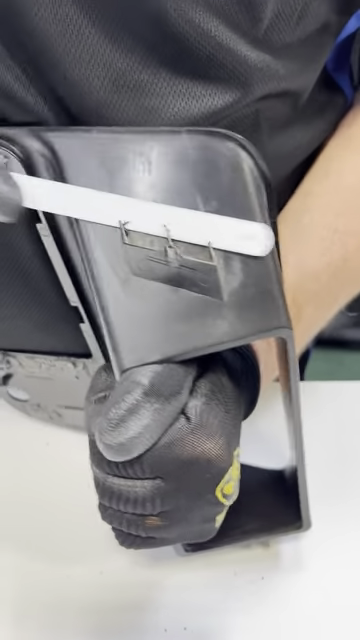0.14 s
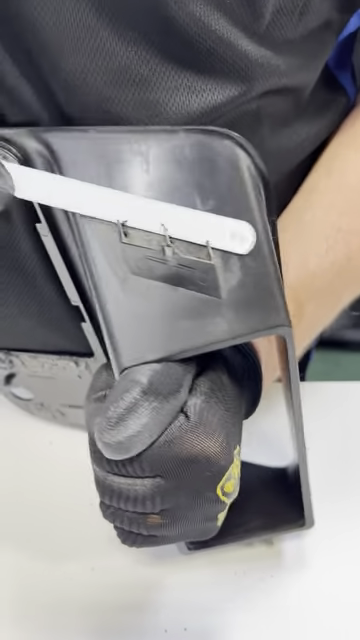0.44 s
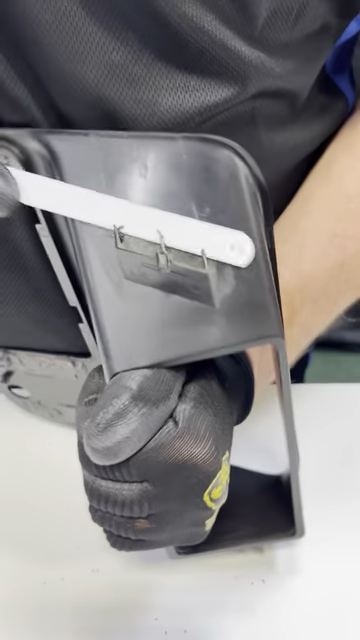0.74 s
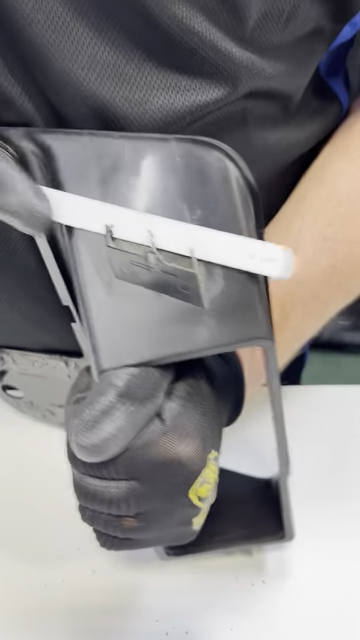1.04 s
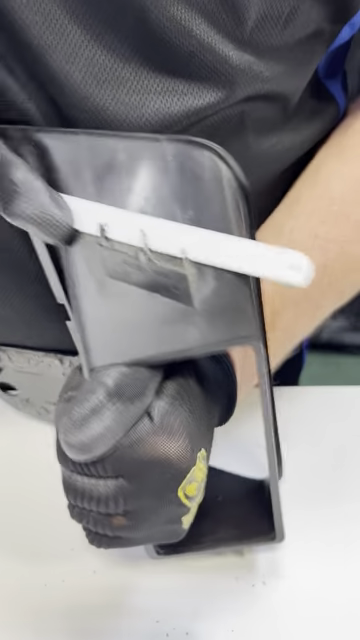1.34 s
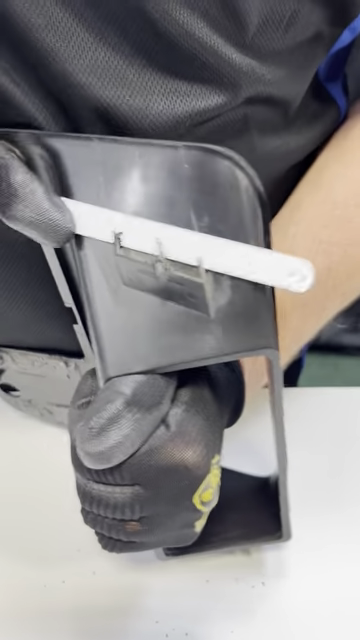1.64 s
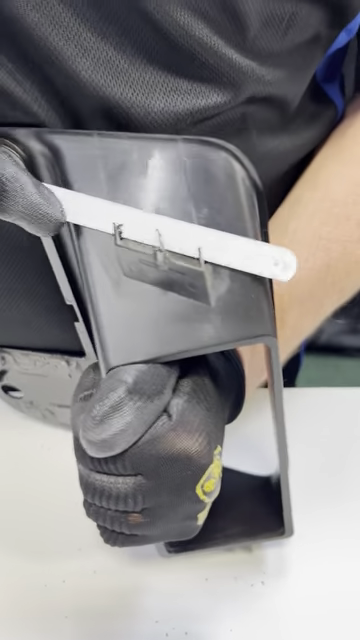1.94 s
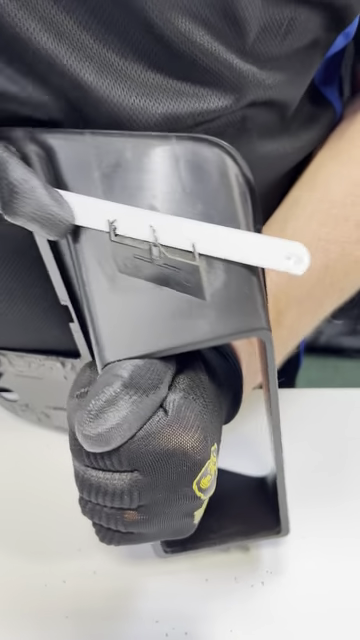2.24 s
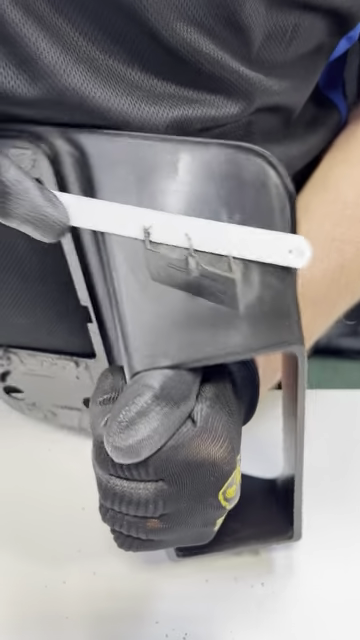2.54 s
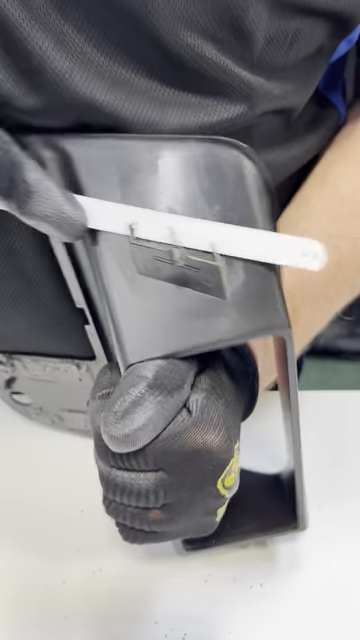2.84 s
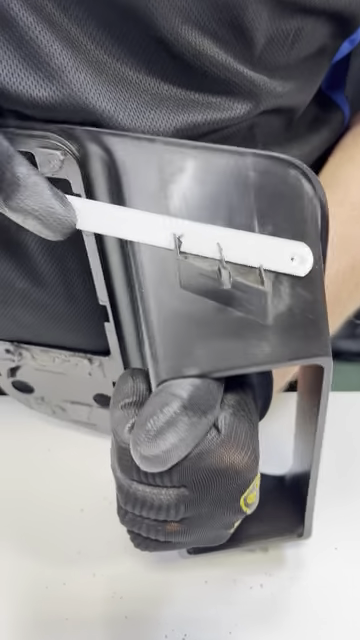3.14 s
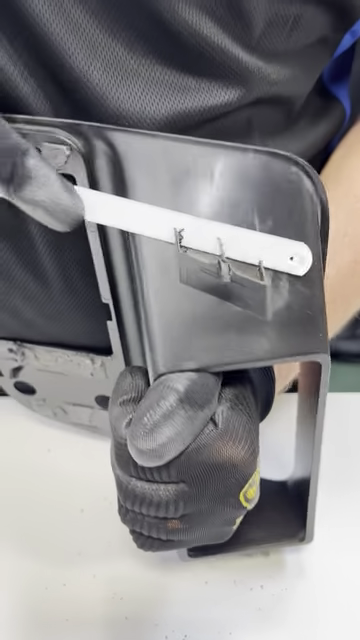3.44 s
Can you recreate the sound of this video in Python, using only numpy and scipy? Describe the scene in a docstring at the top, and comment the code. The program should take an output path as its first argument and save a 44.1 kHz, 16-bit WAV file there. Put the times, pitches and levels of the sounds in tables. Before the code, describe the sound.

Close by in a workshop, a hacksaw blade rasps and buzzes rapidly through hollow plastic, which rumbles softly. The sawing falters into a few uneven scrapes and clicks, then the blade slides faintly in the cut.

```python
"""In a workshop, close by, a bare hacksaw blade saws a hand-held plastic housing in quick strokes.
In each stroke the teeth speed up and slow down, ringing the plastic and tearing off chips.
Now and then a tooth snags. The housing rumbles in the gloved hand and thumps as it springs back.
The strokes falter and stop, and the blade slides faintly in the cut."""
import sys
import numpy as np
from scipy import signal
from scipy.fft import rfft, irfft
from scipy.io import wavfile

SR = 44100
rng = np.random.default_rng(int(sys.argv[2]) if len(sys.argv) > 2 else 0)


def int16_out(signal):
    """Quantize to a 16-bit WAV file."""
    q = np.round(np.clip(np.atleast_2d(signal).T, -1, 1) * 32767)
    wavfile.write(sys.argv[1], SR, q.astype(np.int16))


N = 158760  # 3.6 seconds


def undb(db):
    """Turn decibels into a number to multiply by."""
    return 10 ** (np.asarray(db) / 20)


def unit(x):
    """Scale a signal so its average level (rms) is 1."""
    return x / np.sqrt(np.mean(x ** 2))


def wander(hz):
    """Drift to a new random value hz times a second, with a typical size of 1."""
    return unit(np.interp(np.arange(N) / SR * hz, np.arange(N), rng.standard_normal(N)))


def hump(t, start, top, end):
    """Half a sine wave that rises from start to top and falls to end."""
    return np.abs(np.sin(np.pi * np.interp(t, [start, top, end], [0, .5, 1])))


def pitch_curve(points, size):
    """Join (pitch_hz, value) points into a curve over the spectrum of size samples."""
    hz, value = np.array(points, float).T
    return np.interp(np.log(np.fft.rfftfreq(size, 1 / SR) + 1), np.log(hz + 1), value)


def colour(x, points):
    """Make some pitches louder and others softer; white noise keeps its overall level."""
    gains = unit(undb(pitch_curve(points, size=16384)))
    cepstrum = irfft(np.log(gains))
    half = len(cepstrum) // 2
    cepstrum[1:half] *= 2  # folded so the filter rings only after a sound, never before
    cepstrum[half + 1:] = 0
    response = irfft(np.exp(rfft(cepstrum)))[:half]
    return signal.fftconvolve(x, response)[:len(x)]


def play_through(drive, level, body):
    """Send a signal through a filter (body) so the result follows the given level."""
    return body(drive * level) / np.std(body(drive))


# Saw strokes: start_s, fastest_s, hardest_s, end_s, top_teeth_hz, buzz_db, rasp_db, hiss_db
STROKES = [ (-.06, -.03, -.025, .014, 600, -14, -17, -29), (.086, .118, .130, .168, 735, -11, -19, -29.5),
           (.212, .245, .250, .292, 790, -21.5, -18, -29.5), (.356, .395, .402, .450, 665, -13, -19, -28.5),
           (.488, .522, .526, .565, 620, -25, -20, -32), (.635, .677, .678, .722, 570, -20, -21, -35),
           (.751, .783, .788, .816, 595, -22, -19, -33), (.899, .940, .938, .976, 595, -15, -21, -35),
           (1.001, 1.038, 1.032, 1.074, 590, -21, -19, -34),
           (1.152, 1.193, 1.200, 1.238, 690, -17, -25, -35),
           (1.266, 1.314, 1.324, 1.352, 635, -21, -20, -32),
           (1.430, 1.465, 1.466, 1.515, 675, -19, -23, -35),
           (1.556, 1.592, 1.598, 1.638, 590, -23, -19, -33),
           (1.732, 1.760, 1.754, 1.814, 705, -17, -19, -33),
           (1.856, 1.900, 1.902, 1.940, 460, -21, -24, -37),
           (2.030, 2.060, 2.060, 2.105, 400, -56, -50, -58.5),
           (2.146, 2.175, 2.172, 2.208, 500, -45, -37, -42),
           (2.284, 2.320, 2.320, 2.374, 500, -26, -29, -40),
           (2.443, 2.458, 2.458, 2.472, 420, -25, -22, -31.5),
           (2.605, 2.635, 2.635, 2.658, 450, -66, -46, -52),
           (2.735, 2.750, 2.750, 2.775, 480, -36, -24, -33),
           (2.862, 2.896, 2.893, 2.925, 640, -17, -20, -31.5),
           (2.905, 2.925, 2.925, 2.965, 400, -45.5, -36.5, -46.5),
           (3.035, 3.075, 3.075, 3.120, 400, -59, -49.5, -55.5),
           (3.285, 3.322, 3.322, 3.360, 400, -68.5, -56.5, -57.5),
           (3.470, 3.515, 3.515, 3.556, 450, -58, -47, -53)]

def arm_strokes():
    """Each push of the arm swells and fades the teeth per second and the buzz, rasp and hiss levels."""
    t = np.arange(N) / SR
    edge_speed = .32  # share of top speed at which the teeth start to bite
    teeth_hz, levels = np.zeros(N), np.zeros((3, N))
    for start, fastest, hardest, end, top_hz, buzz_db, rasp_db, hiss_db in STROKES:
        inside = (t > start) & (t < end)
        speed = hump(t[inside], start, fastest, end) ** 1.25
        teeth_hz[inside] = top_hz * (edge_speed + (1 - edge_speed) * speed)
        push = hump(t[inside], start, hardest, end)
        levels[:, inside] += [undb(buzz_db) * push ** 2.1,
                              undb(rasp_db) * push ** 1.7,
                              undb(hiss_db) * push ** 1.2]
    return teeth_hz, levels


def tooth_phase(teeth_hz, jitter=.025):
    """How far the blade is from one tooth to the next, 0 to 1; it restarts after each pause."""
    teeth_passed = np.cumsum(teeth_hz * (1 + jitter * wander(hz=400))) / SR
    at_last_pause = np.maximum.accumulate(np.where(teeth_hz == 0, teeth_passed, 0))
    return (teeth_passed - at_last_pause) % 1


# Notes the plastic rings at: pitch_hz, width_hz, gain_db
HOUSING_NOTES = [(430, 120, -13), (580, 100, -5), (675, 100, -2), (888, 100, 2), (1030, 140, -0.5),
                 (1160, 130, -3), (1310, 130, -3), (1790, 180, -5), (2080, 170, -3), (2640, 260, -13),
                 (3090, 250, -14), (4300, 500, -17)]

def housing(x):
    """The plastic rings briefly at its own notes when something shakes it."""
    out = 0
    for k, (hz, width, db) in enumerate(HOUSING_NOTES):
        ring = signal.lfilter(*signal.iirpeak(hz, hz / width, fs=SR), x)
        out = out + (-1) ** k * undb(db) * ring  # every other note is flipped over
    return out


# Tone of the teeth's buzz: pitch_hz, gain_db
BUZZ_TONE = [(100, -16), (300, -6), (600, 2), (1200, -1), (2000, -6), (2700, -10), (3500, -14), (8000, -26)]

def tooth_buzz(phase, bite, level, sharpness=45):
    """Each tooth plucks the plastic, so fast that the plucks blur into a buzz."""
    plucks = np.exp(-sharpness * (1 - np.cos(2 * np.pi * phase))) * bite
    ring = colour(housing(plucks * level), BUZZ_TONE)
    return unit(ring) * np.sqrt(np.mean(level ** 2))


def chips(tearing, scatter_db=2.6):
    """Chips tear off in uneven bursts of noise."""
    return tearing * rng.standard_normal(N) * undb(scatter_db * wander(hz=1000))


# Tone of the rasp: pitch_hz, gain_db
RASP_TONE = [(100, -5), (300, 1), (600, -1), (1200, -2), (2000, -1.5), (2700, -1), (3500, -3.5),
             (8000, -10), (16000, -22)]

def chip_rasp(tearing, level):
    """Tearing chips shake the housing into a rough rasp."""
    return play_through(chips(tearing), level, lambda x: colour(housing(x), RASP_TONE))


# Tone of the hiss: pitch_hz, gain_db
HISS_TONE = [(200, -12), (1000, -6), (2500, -1), (3500, -3), (4500, -1), (6000, 1), (8500, -1), (11000, 0),
             (13000, -7), (16000, -12)]

def chip_hiss(tearing, level):
    """Tearing chips also give a bright hiss, straight from the cut."""
    return play_through(chips(tearing), level, lambda x: colour(x, HISS_TONE))


def sawing(bite_db=1.8, grip_db=1.6, wide_rasp_db=-14, wide_hiss_db=-12):
    """Each tooth plucks, then tears out chips. Gives the main sound and a part for stereo width."""
    teeth_hz, (buzz_level, rasp_level, hiss_level) = arm_strokes()
    phase = tooth_phase(teeth_hz)
    moving = teeth_hz > 0
    burst = np.exp(-phase / .45) * moving  # tearing fades before the next tooth
    burst = unit(burst) * np.sqrt(np.mean(moving)) + ~moving  # average level 1, moving or not
    bite = undb(bite_db * wander(hz=600))  # some teeth bite harder
    grip = undb(grip_db * wander(hz=170))  # the blade chatters
    tearing = bite * grip * burst
    buzz = tooth_buzz(phase, bite, buzz_level)
    rasp, wide_rasp = (chip_rasp(tearing, rasp_level) for _ in range(2))
    hiss, wide_hiss = (chip_hiss(tearing, hiss_level) for _ in range(2))
    return buzz + rasp + hiss, undb(wide_rasp_db) * wide_rasp + undb(wide_hiss_db) * wide_hiss


# Tone of the shuddering housing: pitch_hz, gain_db
RUMBLE_TONE = [(20, -18), (32, -14), (43, -6), (60, -13), (80, 2), (98, -6), (125, -6), (145, -9),
               (172, -3.5), (205, -8), (238, -6), (310, -16), (450, -16.5), (1000, -52)]
# How hard it shudders: time_s, level_db
RUMBLE_LEVELS = [(0.0, -35), (0.2, -40), (0.59, -33), (0.87, -43), (0.9, -38), (1.96, -38), (2.02, -46),
                 (2.22, -34), (2.26, -47), (2.31, -31), (2.67, -42), (2.69, -50), (2.76, -30), (2.84, -44),
                 (2.87, -32), (3.41, -62), (3.54, -47), (3.6, -62)]

def rumble():
    """The whole housing shudders in the hand while it is being sawn."""
    times, db = np.array(RUMBLE_LEVELS).T
    level = undb(np.interp(np.arange(N) / SR, times, db))
    return unit(colour(rng.standard_normal(N), RUMBLE_TONE)) * level


# Tone of the room's echo: pitch_hz, gain_db
ECHO_TONE = [(100, -4), (400, 0), (650, -1), (1000, -1), (2500, -4), (6000, -1), (10500, -4), (13000, -18)]
# Tone of the room's still air: pitch_hz, gain_db
AIR_TONE = [(30, -4), (120, -7.5), (300, -16), (1000, -23), (2000, -22), (6000, -28), (11000, -36),
            (13000, -50), (16000, -54)]

def workshop(x, echo_db=-21.5, fade_s=.5, air_db=-57):
    """The room gives a faint echo and a steady hush of air, for one ear."""
    t = np.arange(SR) / SR
    tail = rng.standard_normal(SR) * undb(-60 * t / fade_s) * (1 - np.exp(-t / .008))
    echo = signal.fftconvolve(colour(x, ECHO_TONE), tail / np.linalg.norm(tail))[:N]
    air = colour(rng.standard_normal(N), AIR_TONE)
    return undb(echo_db) * echo + undb(air_db) * air


# Teeth that catch: time_s, half_length_s, knock_db, crack_db
SNAGS = [ (.097, .002, -21, -37), (.114, .002, -18, -24.5), (.258, .001, -22, -15), (.264, .002, -27, -20),
         (.372, .003, -20, -38), (.418, .002, -32, -17.5), (.424, .002, -19, -25), (.433, .002, -24, -18),
         (.520, .001, -15, -23), (.535, .002, -16, -36), (.557, .001, -36, -37), (.642, .002, -26, -46),
         (.755, .001, -34, -32), (.778, .002, -18, -30), (.793, .002, -15.5, -30), (.911, .003, -19, -44),
         (1.012, .002, -19, -36), (1.026, .001, -18.5, -18.5), (1.061, .002, -23.5, -40),
         (1.300, .002, -19.5, -33), (1.334, .002, -15, -26), (1.607, .002, -20, -33),
         (1.745, .003, -17, -51), (1.898, .003, -11, -27), (1.920, .002, -24.5, -33.5),
         (2.023, .0005, -56, -43.5), (2.313, .003, -18, -38), (2.340, .003, -27, -38.5),
         (2.423, .0015, -29, -31), (2.437, .0015, -23.5, -29.5), (2.456, .002, -22, -29),
         (2.708, .001, -34, -40), (2.720, .002, -17, -19), (3.020, .0015, -24, -23),
         (3.061, .001, -41, -40), (3.090, .001, -42.5, -51), (3.208, .003, -52, -53.5),
         (3.395, .003, -48, -48.5), (3.526, .001, -31.5, -43)]
# Tone of the crack: pitch_hz, gain_db
CRACK_TONE = [(200, -13.5), (1000, -0.5), (2200, 6.5), (3500, -0.5), (6500, 2), (8500, -4), (11000, -4.5),
              (13000, -11.5), (16000, -15)]

def snags():
    """A tooth catches and breaks free: a short crack and a knock in the housing."""
    t = np.arange(N) / SR
    knock_level, crack_level = np.zeros((2, N))
    for time_s, half_length_s, knock_db, crack_db in SNAGS:
        burst = np.exp(-.5 * ((t - time_s) / half_length_s) ** 2)
        knock_level += undb(knock_db) * burst
        crack_level += undb(crack_db) * burst
    knocks = play_through(rng.standard_normal(N), knock_level, housing)
    cracks = play_through(rng.standard_normal(N), crack_level, lambda x: colour(x, CRACK_TONE))
    return knocks + cracks


# Thumps of the housing: start_s, pitch_hz, gain_db
THUMPS = [(.283, 200, -28), (.556, 150, -24), (.648, 250, -26), (1.064, 112, -25), (1.345, 105, -24),
          (1.795, 245, -24), (2.19, 105, -28), (2.452, 400, -25), (2.722, 410, -24), (2.748, 78, -24),
          (3.07, 215, -34)]

def thumps(rise_s=.004, decay_s=.012):
    """The housing springs back with a short, low wobble as the blade lets go."""
    out = np.zeros(N)
    for start_s, pitch_hz, gain_db in THUMPS:
        age = np.maximum(np.arange(N) / SR - start_s, 0)
        swell = 2 * (1 - np.exp(-age / rise_s)) * np.exp(-age / decay_s)
        out += undb(gain_db) * swell * np.sin(2 * np.pi * pitch_hz * age)
    return out


# How much louder the saw is on the left: pitch_hz, gain_db
LEFT_LOUDER = [(150, 0), (400, 1.2), (700, 1.6), (1300, 2), (2300, 0), (15000, 0)]
# How far its wave is ahead on the left: pitch_hz, phase_radians
LEFT_AHEAD = [(150, 0), (1460, -.2), (2070, .1), (2350, -.3), (2760, 2.3), (3150, .2), (5080, -.2),
              (5600, -1.1), (12000, -1.4), (15000, -1.7)]

def scene():
    """The saw reaches left and right a little differently; rumble, thumps and the room join it."""
    saw, wide = sawing()
    saw = saw + snags()
    sides = np.array([[1], [-1]])  # left, right
    balance = undb(sides * pitch_curve(LEFT_LOUDER, N) / 2)
    shift = np.exp(.5j * sides * pitch_curve(LEFT_AHEAD, N))
    direct = irfft(rfft(saw) * balance * shift, N) + sides * wide
    return direct + rumble() + thumps() + np.array([workshop(saw), workshop(saw)])


def record(dry):
    """Cut away the very highest treble."""
    top_hz = 16300
    return signal.sosfilt(signal.ellip(8, .2, 70, top_hz, fs=SR, output="sos"), dry)


dry = scene()
out = record(dry)
int16_out(out)
```